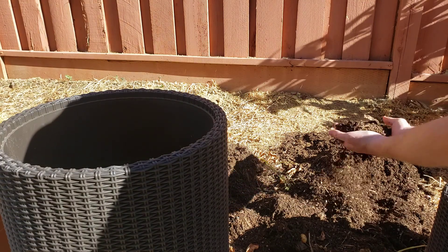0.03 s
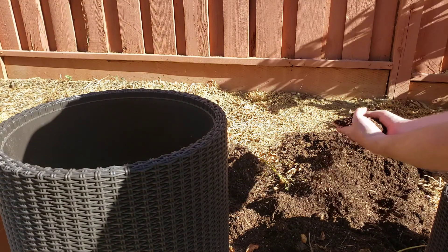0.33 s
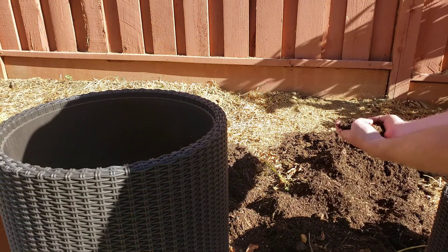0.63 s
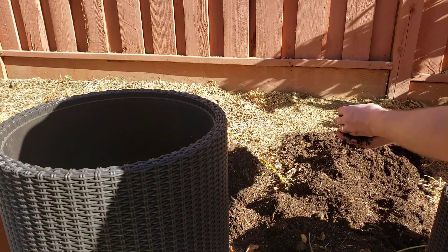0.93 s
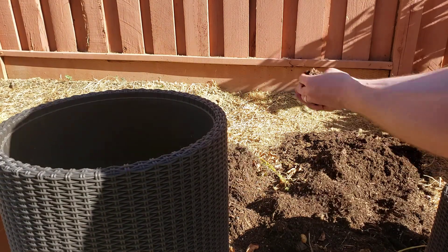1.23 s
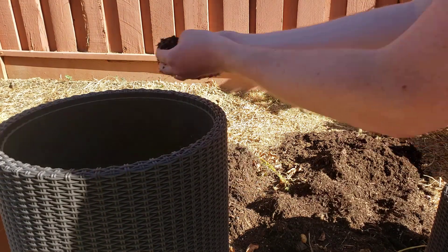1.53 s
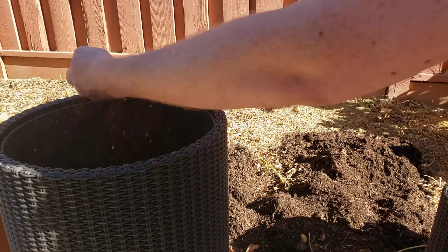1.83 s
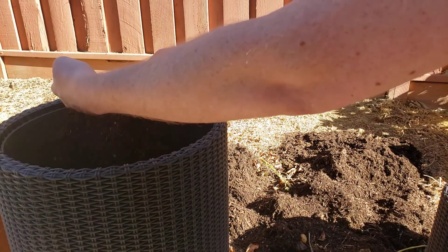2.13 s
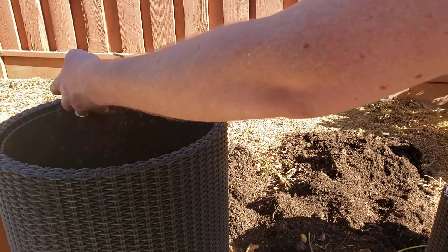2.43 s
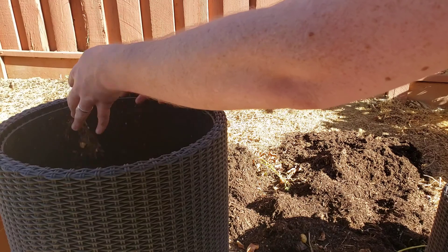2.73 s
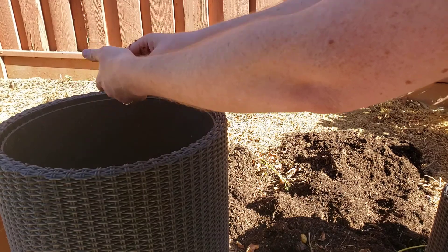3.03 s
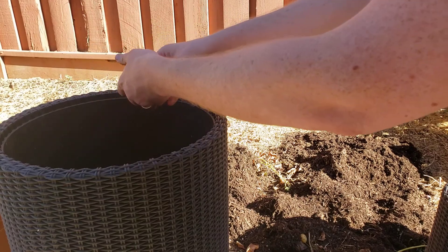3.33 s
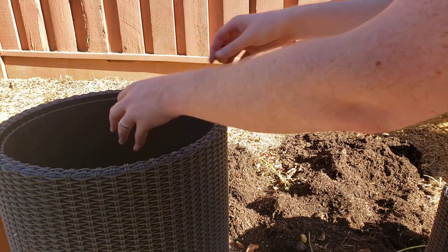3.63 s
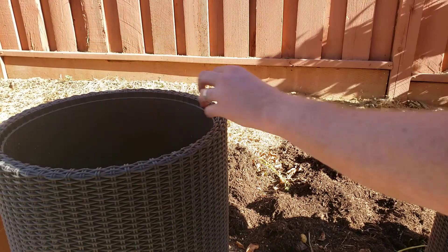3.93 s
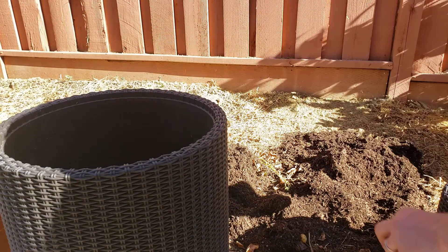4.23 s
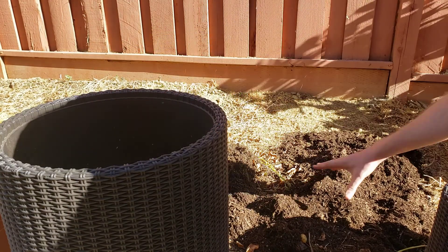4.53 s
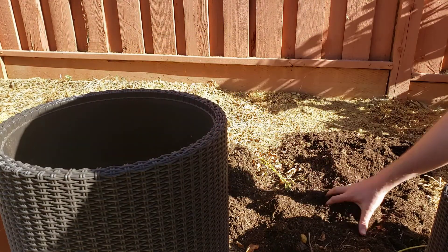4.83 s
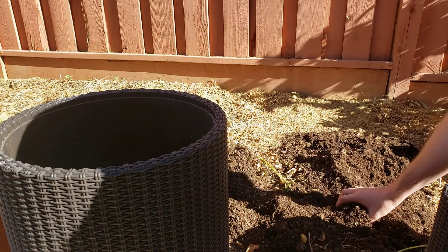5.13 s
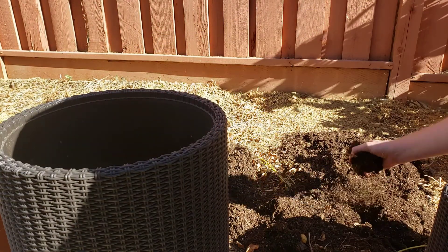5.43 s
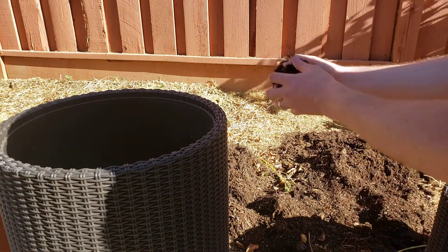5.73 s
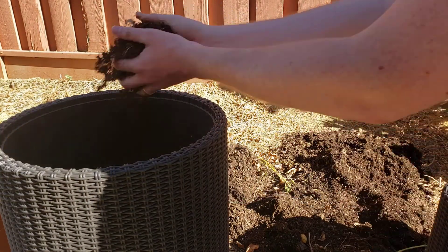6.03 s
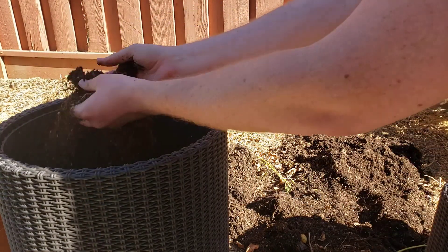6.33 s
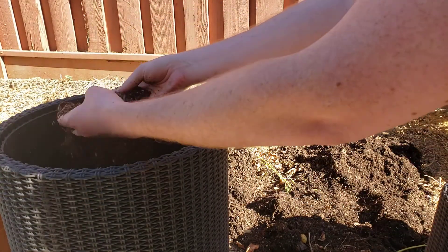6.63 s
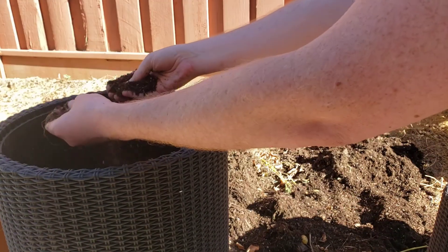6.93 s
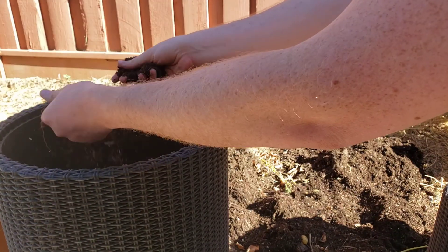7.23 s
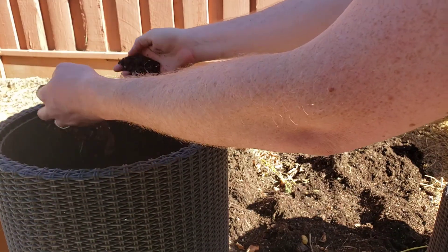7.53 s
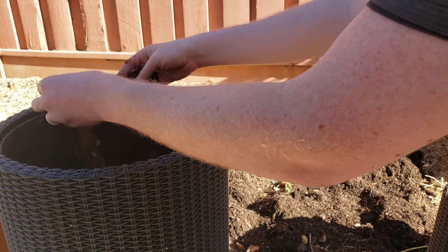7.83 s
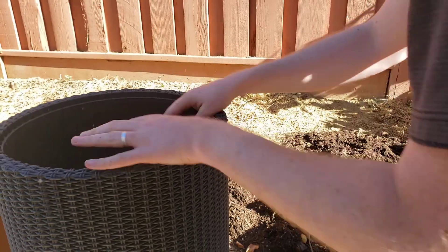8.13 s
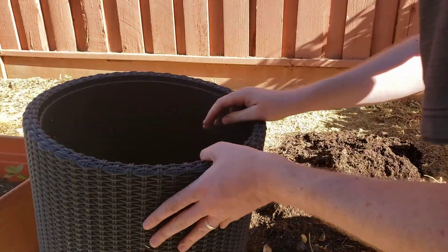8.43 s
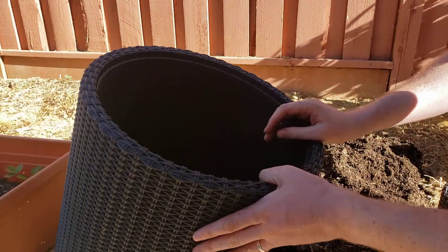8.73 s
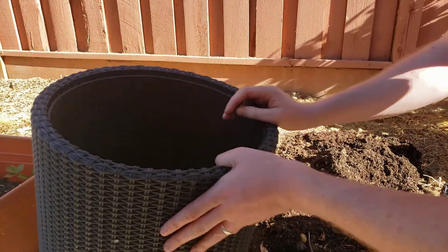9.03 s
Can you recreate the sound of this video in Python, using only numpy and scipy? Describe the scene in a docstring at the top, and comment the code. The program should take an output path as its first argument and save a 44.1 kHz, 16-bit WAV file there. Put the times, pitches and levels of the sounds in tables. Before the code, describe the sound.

Two handfuls of dry soil patter into a large plastic planter near the microphone, the clods thudding with a hollow resonance. Gusts of wind and a few thin metal clinks come before the first; a hollow bouncing knock and faint scooping fall between them. Near the end a bird chirps faintly in the quiet garden while the planter bumps and scrapes, then lands with a deep boom.

```python
"""Wind buffets the microphone and a small piece of metal clinks in a garden. Two handfuls of dry soil are
crumbled into a big hollow plastic planter: grit ticks, crumbs patter on its floor, and clods excite the
resonances of its air column. Between the handfuls something hollow is knocked and a hand scoops soil;
a faint low rumble lies under the second pour. At the end the planter is tilted and dropped back with
a boom, while a bird chirps far off."""
import sys
import numpy as np
from scipy import signal
from scipy.fft import rfft, irfft
from scipy.io import wavfile
from scipy.ndimage import uniform_filter1d

SR = 44100
rng = np.random.default_rng(int(sys.argv[2]) if len(sys.argv) > 2 else 0)


def wav_record(signal):
    """Record a signal, one row per channel, as 16-bit PCM in the file named by sys.argv[1]."""
    frames = np.transpose(np.atleast_2d(signal))
    bounded = np.clip(frames, -1, 1)
    # unit amplitude maps onto the largest positive 16-bit level
    quanta = np.round(bounded * 32767).astype(np.int16)
    wavfile.write(sys.argv[1], SR, quanta)


N = 409688
TIME = np.arange(N) / SR
AGE = np.arange(SR // 2) / SR  # seconds since the onset of one event

# Modes of the planter's wall. Each row: frequency in Hz, level in dB, 60 dB decay time in seconds.
WALL_MODES = [(480, 3, 0.023), (500, -9.5, 0.059), (602, 11, 0.096), (708, -8.5, 0.055), (835, 10.5, 0.078),
              (919, 4, 0.15), (1030, 10, 0.042), (1166, -2, 0.064), (1250, -10.5, 0.087), (1463, 1, 0.099),
              (1820, 3.5, 0.027)]
# Spectra of a crumb and of a slap on the plastic. Each row: frequency in Hz, spectral density in dB.
CRUMB_SPECTRUM = [(60, -38), (300, -2), (500, -1), (650, 3.5), (950, 6.5), (1500, -7), (2500, -7),
                  (4000, -8.5), (7000, -24), (16000, -77)]
SLAP_SPECTRUM = [(60, -52), (150, 2), (350, 5), (1000, -8.5), (1500, -19), (1900, -23.5), (2400, -23),
                 (4000, -32.5), (8000, -56), (16000, -51)]


def undb(db):
    """Decibels to amplitude ratio."""
    return 10 ** (np.asarray(db) / 20)


def unit(x):
    """Normalise to an rms of 1."""
    return x / np.sqrt(np.mean(x ** 2))


def peak(x):
    """Normalise to a peak of 1."""
    return x / np.abs(x).max()


def add(out, start_s, sound):
    """Superposition: a sound adds to those already present."""
    start = int(np.clip(start_s * SR, 0, N - 1))
    out[:, start:start + sound.shape[-1]] += sound[..., :N - start]


def convolve(x, response):
    """Convolution with an impulse response, cut to the length of x."""
    return signal.fftconvolve(np.atleast_2d(x), np.atleast_2d(response), axes=-1)[:, :x.shape[-1]]


def colour(x, spectrum, size=4096):
    """Minimum-phase filtering through (Hz, dB) points; folding the cepstrum makes it causal."""
    hz, db = np.transpose(spectrum)
    curve_db = np.interp(np.log(np.arange(size // 2 + 1) * SR / size + 1), np.log(hz), db)
    cepstrum = irfft(np.log(undb(curve_db)))[:size // 2]
    cepstrum[1:] *= 2
    return convolve(x, irfft(np.exp(rfft(cepstrum, size))))


def widen(pair, hz):
    """Mid-side mixing: two independent signals become a stereo pair, coherent below hz."""
    side = signal.sosfilt(signal.butter(1, min(hz, SR / 3), "high", fs=SR, output="sos"), pair[1])
    return np.array([pair[0] + side, pair[0] - side])


def lag(x, samples):
    """Arrival time gives direction: delay the left channel, or the right if samples is negative."""
    delays = (max(samples, 0), max(-samples, 0))
    return np.array([np.pad(channel, (delay, 0))[:len(channel)] for channel, delay in zip(x, delays)])


def fade(t60):
    """Exponential decay by 60 dB in t60 seconds."""
    return undb(-60 * AGE / t60)


def wander(rate_hz):
    """Slow random modulation: smoothed random steps with an rms of 1."""
    size = int(SR / rate_hz)
    steps = np.repeat(rng.standard_normal(N // size + 1), size)
    return unit(uniform_filter1d(uniform_filter1d(steps, size), size)[:N])


def envelopes(events, rise_s, falls_s):
    """Exponential rise, hold and decay: one gain curve per level column, with times for 60 dB."""
    start, length, *levels = np.transpose(events)[..., None]
    early, late = np.maximum(start - TIME, 0), np.maximum(TIME - start - length, 0)
    return [undb((db - 60 * (early / rise_s + late / fall_s)).max(axis=0))
            for db, fall_s in zip(levels, falls_s)]


def ring(modes, scatter_db=0, detune=0):
    """Free vibration is a sum of damped modes, whose strengths vary with the spot that is struck."""
    out = 0
    for hz, db, t60 in modes:
        gain = undb(db + scatter_db * rng.standard_normal())
        detuned_hz = hz * (1 + detune * rng.standard_normal())
        out = out + gain * fade(t60) * np.sin(2 * np.pi * detuned_hz * AGE)
    return out


def push(response, ms, low_hz=75):
    """Response to a force pulse: longer contact is duller, and slow motion radiates little."""
    force = np.sin(np.pi * np.minimum(AGE * 1000 / ms, 1)) ** 2
    radiation = signal.butter(2, low_hz, "high", fs=SR, output="sos")
    return peak(signal.sosfilt(radiation, convolve(response, force)))


def burst(spectrum, t60, tail_db, tail_t60, wide_hz):
    """Impact noise: a short crack followed by a decaying tail of reflections."""
    noise = widen(rng.standard_normal((2, len(AGE))), wide_hz)
    return colour(noise * (fade(t60) + undb(tail_db) * fade(tail_t60)), spectrum)


def shower(response, per_s, spread_db, spots=4):
    """Shot noise: grains of uneven size land at random on a few spots, each with its own response."""
    out = 0
    for _ in range(spots):
        sizes = undb(spread_db * np.minimum(rng.standard_exponential(N), 4)) * rng.choice([-1, 1], N)
        landings = rng.random(N) < per_s / spots / SR
        out = out + convolve(sizes * landings, response())
    return unit(out)


def garden():
    """Ambient noise: quiet outdoor air with a faint hiss, drifting slightly in level."""
    # Each row: frequency in Hz, spectral density in dB.
    air_spectrum = [(15, -51.5), (25, -33.5), (59, 1.5), (82, -21), (127, -8), (149, -21), (180, -24.5),
                    (212, -20), (416, -25), (677, -29), (840, -31.5), (2110, -37), (6560, -41),
                    (13200, -34), (16000, -33)]
    air = colour(widen(rng.standard_normal((2, N)), hz=699), air_spectrum)
    return unit(air) * undb(-65 + 0.8 * wander(3.6))


def bird():
    """Random frequency modulation roughens short glides; scattering by fences and trees smears them."""
    # Each row: start and length in seconds, first and last frequency in Hz, level in dB.
    chirps = [(1.687, 0.043, 4600, 4160, -60.5), (6.11, 0.022, 2900, 2450, -67),
              (7.989, 0.049, 3175, 2590, -50.5), (8.227, 0.044, 2875, 3096, -50),
              (8.28, 0.037, 2710, 2330, -59), (8.384, 0.056, 3230, 2920, -54),
              (8.472, 0.076, 3140, 2320, -49), (8.658, 0.024, 2320, 3160, -52.5)]
    out = np.zeros((2, N))
    for start, length, first_hz, last_hz, db in chirps:
        progress = np.minimum(AGE / length, 1)
        rasp = 1 + 0.049 * wander(600)[:len(AGE)]
        hz = (first_hz + (last_hz - first_hz) * progress) * rasp
        note = np.sin(np.pi * progress) * np.sin(2 * np.pi * np.cumsum(hz) / SR)
        reflections = rng.standard_normal((2, len(AGE))) * fade(0.32)
        add(out, start, undb(db) * peak(convolve(note, reflections)))
    return out


def taps():
    """Faint taps about the garden, each noise shaped by one broad resonance."""
    # Each row: start in seconds, resonance in Hz, level in dB.
    strikes = [(4.406, 2450, -58.5), (4.411, 900, -60), (4.782, 820, -54.5), (5.547, 562, -48),
               (5.55, 1350, -57), (5.579, 527, -69), (5.993, 1140, -58), (7.9, 930, -49.5),
               (9.157, 1160, -40)]
    out = np.zeros((2, N))
    for start, hz, db in strikes:
        resonance = [(hz / 3, -28), (hz * .75, -9), (hz, 0), (hz * 1.3, -9), (hz * 4, -35)]
        tap = peak(burst(resonance, t60=0.039, tail_db=-0.5, tail_t60=0.31, wide_hz=1500))
        add(out, start, undb(db) * tap)
    return out


def turbulence(spectrum):
    """Random pressure of even strength, uncorrelated between the two microphone ports."""
    swirl = colour(rng.standard_normal((2, N)), spectrum)
    return swirl / np.sqrt(uniform_filter1d(swirl ** 2, size=1500))


def wind_and_rumble():
    """Low rumble and turbulence at the microphone: eddies grow faster and peak in short buffets."""
    # Each row: start and length in seconds, level in dB.
    # The last row is a faint low rumble under the second pour; the others are wind.
    swells = [(0.0, 0.37, -28.5), (0.545, 0.028, -25.5), (0.62, 0.051, -30), (0.775, 0.012, -28),
              (0.95, 0.024, -31), (1.07, 0.017, -34.5), (1.345, 0.23, -38), (1.495, 0.041, -26.5),
              (1.705, 0.046, -30), (1.85, 0.076, -33), (2.33, 0.34, -44), (5.25, 0.06, -62.5),
              (5.99, .11, -55), (6.45, 1.214, -57.5)]
    # Each row: centre in seconds, width in seconds, level in dB.
    buffets = [(0.086, 0.019, -29.5), (0.182, 0.013, -23), (0.22, 0.0099, -26.5), (0.477, 0.016, -31.5),
               (0.514, 0.085, -41.5), (0.813, 0.052, -45), (1.101, 0.029, -41), (1.381, 0.01, -38),
               (1.735, 0.14, -50.5)]
    # Each row: frequency in Hz, spectral density in dB.
    rumble_spectrum = [(15, -23), (35, 1), (70, 12), (110, 4.5), (200, -11.5), (300, -24), (450, -28.5),
                       (800, -62), (4000, -64)]
    eddy_spectrum = [(30, -34.5), (120, -2.5), (220, 10), (350, -4), (500, -15.5), (800, -38), (4000, -82)]
    swell = envelopes(swells, rise_s=0.18, falls_s=[0.37])[0] * undb(1.83 * wander(45))
    buffet = sum(undb(db) * np.exp(-(2 * (TIME - centre) / width) ** 2) for centre, width, db in buffets)
    eddies = (undb(-15) * swell * peak(swell) ** 0.33 + buffet) * turbulence(eddy_spectrum)
    return swell * turbulence(rumble_spectrum) + undb([[-1], [2.5]]) * eddies


def clinks():
    """Close pairs of modes beat as a small piece of metal rattles on the right, over contact noise."""
    # Each row: start in seconds, then levels of the ring, the lowest mode and the click in dB.
    strikes = [(0.324, -39, -87, -31), (0.331, -24.5, -85, -42), (0.36, -26, -72, -40),
               (0.389, -37, -58.5, -48), (0.5235, -43, -62, -26.5), (0.527, -31, -54.5, -34)]
    # Each row: frequency in Hz, level in dB, 60 dB decay time in seconds.
    metal_modes = [(4862, -24, .25), (4915, -22, .16), (9620, -9, .22), (9700, -11, .08), (12800, -3, .22),
                   (12900, -5, .08), (13412, -7, .16), (14990, -8, .1), (15222, 3, .2), (15310, 4, .09)]
    # Each row: frequency in Hz, spectral density in dB.
    contact_spectrum = [(1000, -31.5), (3500, -40), (5000, -20.5), (8400, -19), (9800, -10), (11500, -12),
                        (13000, -3), (15300, -4), (16000, -13)]
    out = np.zeros((2, N))
    for start, ring_db, lowest_db, click_db in strikes:
        tone = np.array([ring(metal_modes, scatter_db=1.5, detune=.0012) for _ in range(2)])
        flutter = undb(2.5 * wander(350)[:len(AGE)])
        chatter = peak(burst(contact_spectrum, t60=0.12, tail_db=2, tail_t60=0.33, wide_hz=1000))
        click = peak(burst(contact_spectrum, t60=0.009, tail_db=-24, tail_t60=0.14, wide_hz=1000))
        ringing = undb(ring_db) * (peak(tone) * flutter + undb(-7.5) * chatter) * (1 - fade(0.0032))
        lowest = undb(lowest_db) * peak(ring(metal_modes[:1]))  # longer waves reach both ports alike
        add(out, start, (ringing + undb(click_db) * click) * undb([[0], [8]]) + lowest)
    return out


def knocks():
    """A hollow thing bounces to rest on the right; each impact excites its modes over a dull thud."""
    # Each row: start in seconds, level in dB.
    bounces = [(4.153, -11.5), (4.168, -23), (4.189, -19.5), (4.265, -27), (4.318, -37), (4.367, -40.5)]
    # Each row: frequency in Hz, level in dB, 60 dB decay time in seconds.
    hollow_modes = [(90.1, -14.5, 0.27), (208.4, -19.5, 0.19), (373.6, 9.5, .22), (401, -11.5, 0.058),
                    (548.4, -16.5, 0.11), (641, -20.5, 0.089), (824, -24.5, 0.23), (1060, -29, 0.16)]
    # Each row: frequency in Hz, spectral density in dB.
    thud_spectrum = [(25, -34), (85, -20), (250, -19), (400, 17), (700, -3), (1000, -7.5), (1400, -31),
                     (2300, -33.5), (3300, -51.5), (4600, -37), (6000, -52.5), (16000, -63)]
    swell = 1 - fade(0.0095)  # the soft body takes a moment to get moving
    out = np.zeros((2, N))
    for start, db in bounces:
        thud = peak(burst(thud_spectrum, t60=.08, tail_db=-5, tail_t60=0.34, wide_hz=1997))
        body = push(ring(hollow_modes, scatter_db=6.5), ms=0.58, low_hz=108.2)
        add(out, start, undb(db) * swell * (body + undb(-5) * thud))
    return lag(out, samples=15)


def scooping():
    """Fingers in the soil make many tiny clicks that merge into a rustle; dry straw fractures in snaps."""
    # Each row: start in seconds, length in seconds, level in dB.
    strokes = [(0.04, 0.082, -68.5), (1.24, 0.047, -64.5), (4.75, 0.063, -59.5), (4.82, 0.091, -56.5),
               (5.01, 0.029, -60.5), (5.35, 0.055, -80), (5.905, .1, -61.5)]
    # Each row: start in seconds, level in dB.
    snaps = [(0.465, -36), (1.237, -39), (1.266, -34), (1.646, -41), (3.163, -54), (3.425, -43),
             (4.322, -41), (4.859, -36), (5.009, -42.5), (5.902, -37), (7.285, -40)]
    # Each row: frequency in Hz, spectral density in dB.
    straw_spectrum = [(1000, -16.5), (3000, -7.5), (4500, -8.5), (6300, 3), (8400, -5), (10500, 5.5),
                      (16000, 4.5)]
    rustle = shower(lambda: burst(straw_spectrum, t60=0.0035, tail_db=-8, tail_t60=0.19, wide_hz=1000),
                    per_s=280, spread_db=3.5)
    out = envelopes(strokes, rise_s=0.17, falls_s=[0.52])[0] * rustle
    for start, db in snaps:
        snap = peak(burst(straw_spectrum, t60=.007, tail_db=-18, tail_t60=.12, wide_hz=1000))
        add(out, start, undb(db) * snap)
    return out


def tick(t60, tail_db):
    """A hard grain's impact is a bright click, reflected briefly inside the planter."""
    # Each row: frequency in Hz, spectral density in dB.
    grit_spectrum = [(500, -37), (1500, -11.5), (3500, -5), (5000, 0.5), (7000, 1.5), (8400, -0.5),
                     (10000, 4.5), (13000, 8.5), (16000, 3.5)]
    return peak(burst(grit_spectrum, t60, tail_db, tail_t60=0.081, wide_hz=895))


def slap(spectrum, top_hz=1400):
    """A crumb bursts on the plastic with a brief pitch of its own and excites the wall's modes."""
    crack = peak(burst(spectrum, t60=.02, tail_db=-10, tail_t60=.14, wide_hz=1200))
    wall = push(ring(WALL_MODES, scatter_db=4, detune=.002), ms=.25)
    hz = top_hz * 2 ** -rng.uniform(0, 1.71)
    tone = fade(0.032) * np.sin(2 * np.pi * hz * AGE)
    return peak(crack + undb(-11) * wall + undb(-8) * tone)


def tock():
    """A stone or hard crumb excites the wall and two damped modes whose pitch depends on the spot."""
    spot_modes = [(700 * 2 ** rng.uniform(0, .8), 0, .035), (1300 * 2 ** rng.uniform(0, .9), -3, .025)]
    crack = peak(burst(CRUMB_SPECTRUM, t60=.02, tail_db=-14, tail_t60=.1, wide_hz=1800))
    spot = peak(ring(spot_modes))
    wall = peak(ring(WALL_MODES, scatter_db=3))
    return peak(crack + undb(-3) * spot + undb(-7) * wall)


def boom(push_ms, low_hz):
    """Resonance of the planter's air column and floor; light loads hardly move the modes below low_hz."""
    # Each row: frequency in Hz, level in dB, 60 dB decay time in seconds.
    column_modes = [(69.2, -24, 0.44), (108, -28, 0.027), (127.4, -10, 0.28), (175.45, 5.5, 0.14),
                    (197.5, 7.5, 0.12), (276.2, -1, 0.11), (336.4, -5.5, 0.096), (396.5, -19, 0.11)]
    return push(ring(column_modes, scatter_db=2.5, detune=0.058), push_ms, low_hz)


def thump(boom_db, slap_db, push_ms, low_hz):
    """A soft heavy blow drives air column and wall; harder slaps have briefer, brighter contact."""
    contact_ms = 0.21 * undb(slap_db) ** -.3
    wall = peak(slap(SLAP_SPECTRUM) + undb(-3) * push(ring(WALL_MODES, scatter_db=2), ms=contact_ms))
    give = 1 - fade(0.0043)  # soil and plastic yield before they bear
    return give * (undb(boom_db) * boom(push_ms, low_hz) + undb(slap_db) * wall)


def tilting():
    """Stick-slip friction: the base catches and slips on the ground while soil slides inside."""
    # Each row: start and length in seconds, then levels of scraping, grit and rumble in dB.
    shoves = [(7.98, 0.11, -70, -60.5, -49), (8.175, 0.094, -48, -52.5, -39),
              (8.32, 0.23, -59.5, -54.5, -48), (8.48, .14, -61, -58.5, -53),
              (8.648, 0.012, -55.5, -66, -44), (8.98, 0.42, -87, -65, -82), (9.195, 0.054, -30.5, -48, -38)]
    scrape_gain, grit_gain, rumble_gain = envelopes(shoves, rise_s=0.097, falls_s=(0.29, 0.57, 0.32))
    scrape = shower(lambda: slap(SLAP_SPECTRUM), per_s=500, spread_db=2)
    grit = shower(lambda: tick(t60=0.0035, tail_db=-11.5), per_s=1400, spread_db=4.5)
    rumble = shower(lambda: boom(push_ms=3.87, low_hz=85), per_s=140, spread_db=-2.5)
    return scrape_gain * scrape + grit_gain * grit + rumble_gain * rumble


def pouring():
    """Granular impacts from each squeeze of the hands: grit hisses, crumbs patter, soft lumps drum."""
    # Each row: start and length in seconds, then levels of crumbs, grit and lumps in dB.
    squeezes = [(1.885, 0.22, -45.5, -51, -41), (2.06, 0.083, -39.5, -48.5, -32.5),
                (2.22, 0.12, -47, -55.5, -44), (2.47, 0.24, -54.5, -57, -49),
                (2.712, .13, -41.5, -50, -38.5), (2.93, 0.039, -67, -58, -61),
                (6.215, 0.23, -51.5, -53.5, -64), (6.47, 0.34, -49.5, -55, -38.5),
                (6.87, 0.24, -69.5, -57, -40.5), (7.37, 0.3, -73, -63, -46),
                (7.52, 0.18, -64.5, -62.5, -50)]
    crumb_gain, grit_gain, lump_gain = envelopes(squeezes, rise_s=0.14, falls_s=(0.26, 0.57, 0.43))
    crumbs = shower(lambda: slap(CRUMB_SPECTRUM, top_hz=2505), per_s=400, spread_db=4, spots=12)
    grit = shower(lambda: tick(t60=0.0014, tail_db=-8.5), per_s=1100, spread_db=5)
    lumps = shower(lambda: boom(push_ms=1.22, low_hz=176), per_s=170, spread_db=1)
    return crumb_gain * crumbs + grit_gain * grit + lump_gain * lumps


def planter():
    """One resonator, a little to the left, driven by soil, clods, stones and its own rocking and drop."""
    # Each row: start in seconds, boom level in dB, wall slap level in dB.
    clods = [(2.08, -15, -25), (2.112, -25, -27), (2.201, -26, -25), (2.705, -28, -33), (2.83, -26.5, -31),
             (6.447, -30.5, -41), (6.54, -13, -41), (6.574, -28, -29.5), (6.657, -25.5, -30.5),
             (6.741, -26.5, -30), (6.935, -23.5, -36), (7.097, -26.5, -44.5), (7.349, -16.5, -42),
             (7.445, -34, -60), (7.619, -42, -66), (7.655, -40.5, -64)]
    # Bumps of hands and ground. Each row: start in seconds, boom and slap levels in dB, push in ms.
    bumps = [(7.977, -33, -73, 3.8), (8.004, -35, -70, 3.1), (8.123, -37, -71, 3.3),
             (8.18, -23.5, -40, 2.7), (8.199, -16.5, -53, 7.5), (8.26, -30.5, -34, 2),
             (8.316, -38, -30.5, 8.4), (8.378, -27, -37, 1.9), (8.446, -36.5, -28.5, 0.92),
             (8.643, -31, -28, 6.1), (9.162, -33, -34, 5.8), (9.196, -4, -3, 6.3), (9.213, -9.5, -35, 3.1),
             (9.232, -14, -28, 6.9), (9.257, -12, -22, 5.7), (9.271, -11, -26, 1.2)]
    # Each row: start in seconds, tick level in dB, tock level in dB.
    stones = [(1.94, -30, -38), (1.976, -47, -27), (2.008, -25.5, -25), (2.147, -20, -31),
              (2.262, -30, -48), (2.294, -45, -31), (2.321, -32, -50), (2.445, -50, -40),
              (2.459, -29, -30.5), (2.620, -29, -32.5), (2.67, -36, -35), (2.707, -48, -29.5),
              (2.769, -29, -31), (6.269, -25, -37), (6.287, -26, -32), (6.397, -23, -32.5),
              (6.546, -50, -21), (6.800, -50, -29), (7.554, -38.5, -31.5), (8.259, -27, -56),
              (8.442, -26.5, -42), (8.642, -32.5, -38), (9.221, -24, -21)]
    out = pouring() + tilting()
    for start, boom_db, slap_db in clods:
        add(out, start, thump(boom_db, slap_db, push_ms=3.36, low_hz=108))
    for start, boom_db, slap_db, push_ms in bumps:
        add(out, start, thump(boom_db, slap_db, push_ms, low_hz=66))
    for start, tick_db, tock_db in stones:
        add(out, start, undb(tick_db) * tick(t60=.01, tail_db=-16) + undb(tock_db) * tock())
    return lag(out, samples=-5)


def scene():
    """The pressures of all sources add at the microphone."""
    return planter() + scooping() + knocks() + taps() + clinks() + bird() + wind_and_rumble() + garden()


def record(dry):
    """Each microphone port has its own frequency response; a steep low-pass cuts the top."""
    # Each row: frequency in Hz, level of left over right in dB.
    port_balance = [(30, -3.5), (150, 1.5), (300, -0.34), (500, 1), (1500, 1.5), (4000, 1.5), (7200, 9.5),
                    (9500, -3.5), (12000, -3.5), (16000, 2)]
    ports = [colour(channel, [(hz, side * db / 2) for hz, db in port_balance])[0]
             for channel, side in zip(dry, (1, -1))]
    top_hz = 16000
    return signal.sosfilt(signal.ellip(8, .2, 70, top_hz, fs=SR, output="sos"), ports)


dry = scene()
out = record(dry)
wav_record(out)
```